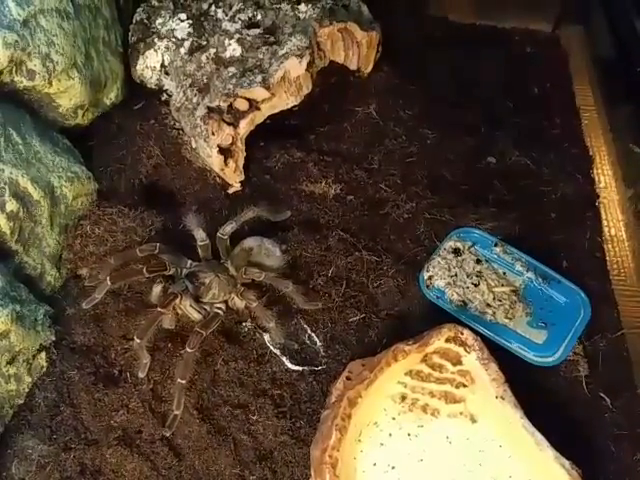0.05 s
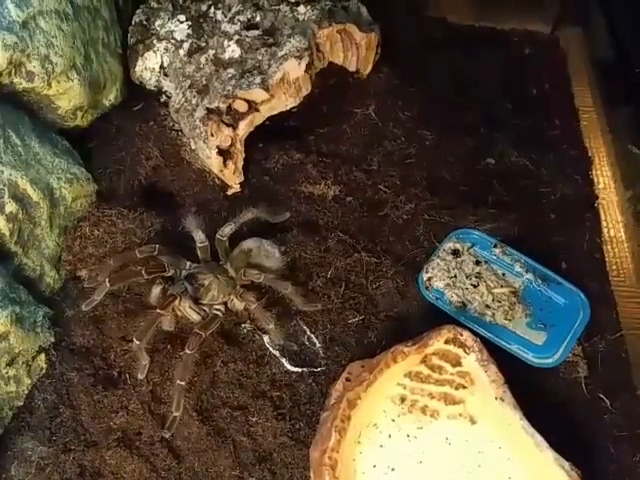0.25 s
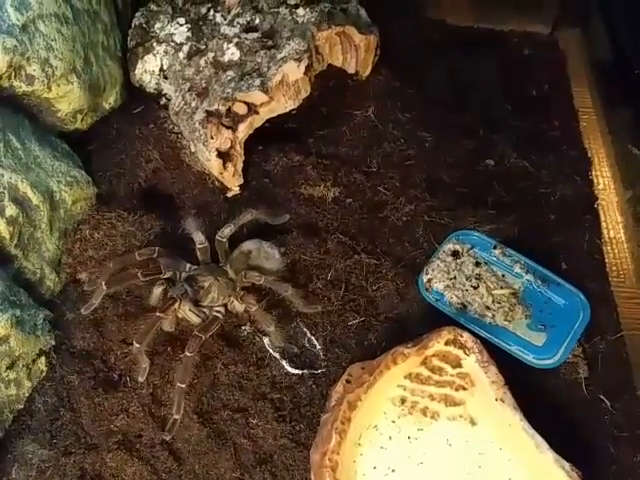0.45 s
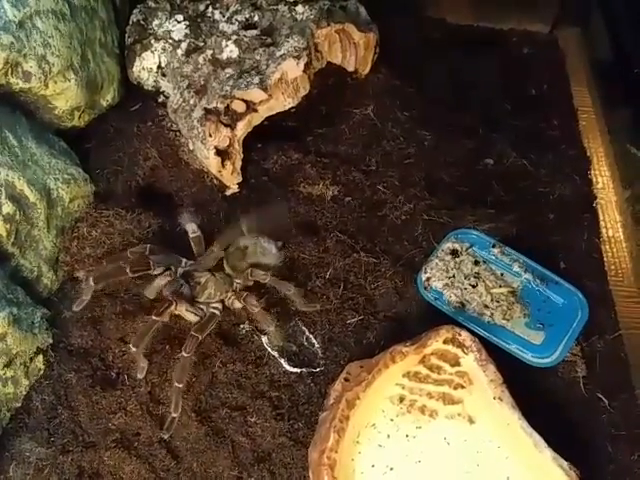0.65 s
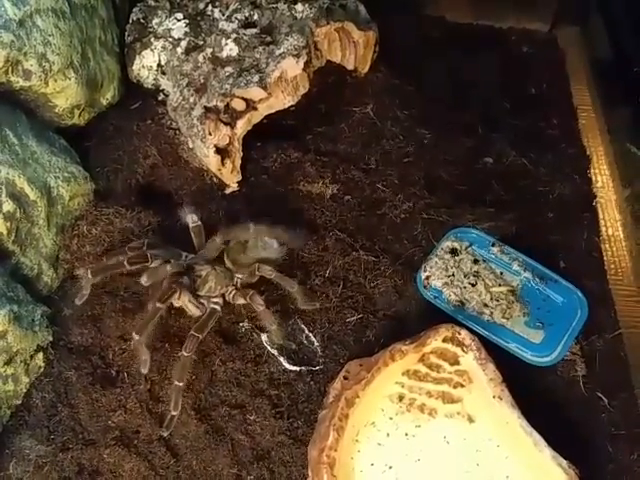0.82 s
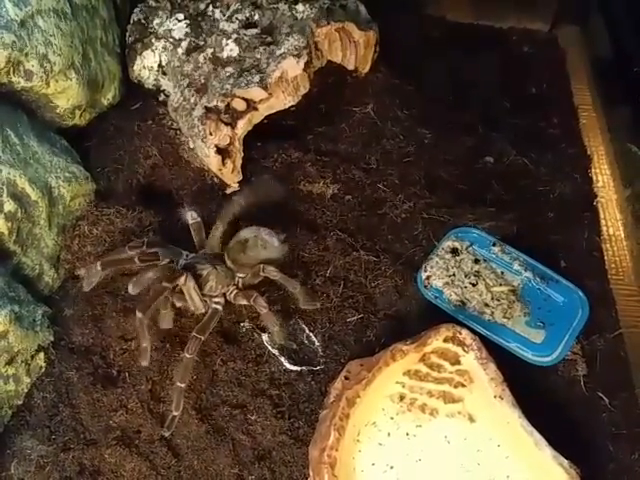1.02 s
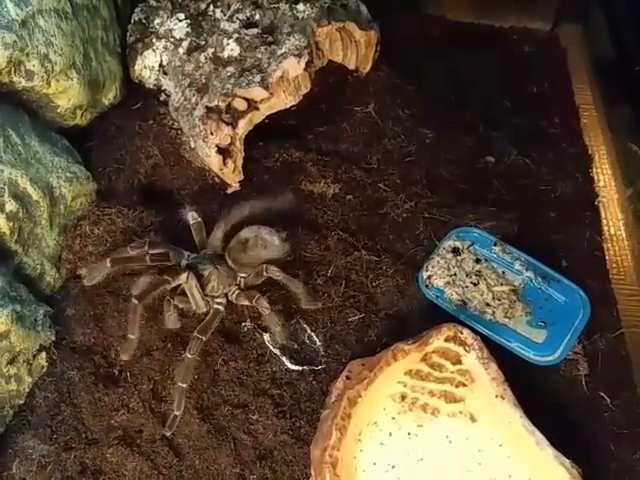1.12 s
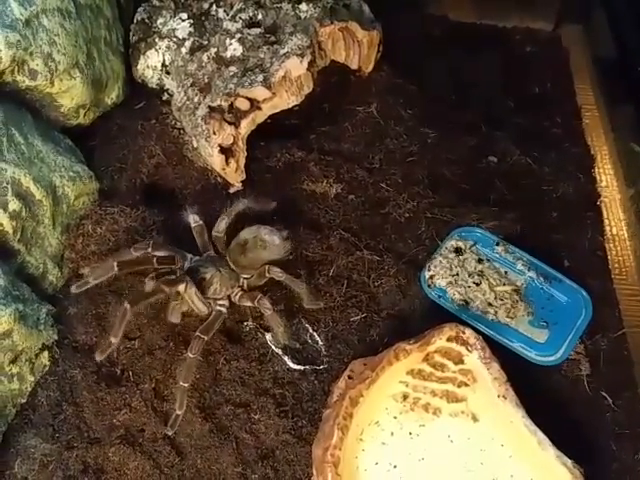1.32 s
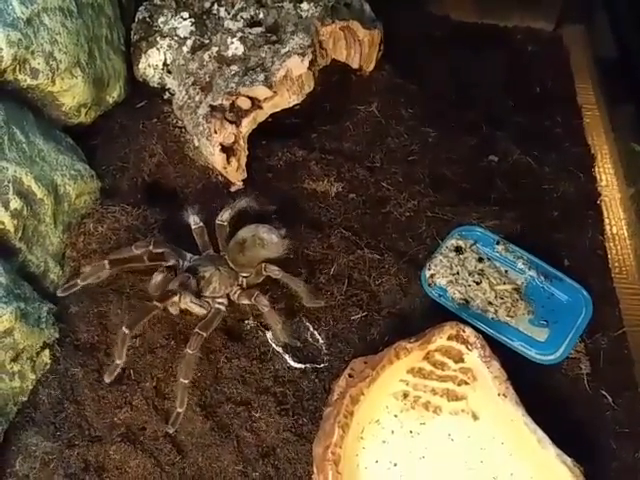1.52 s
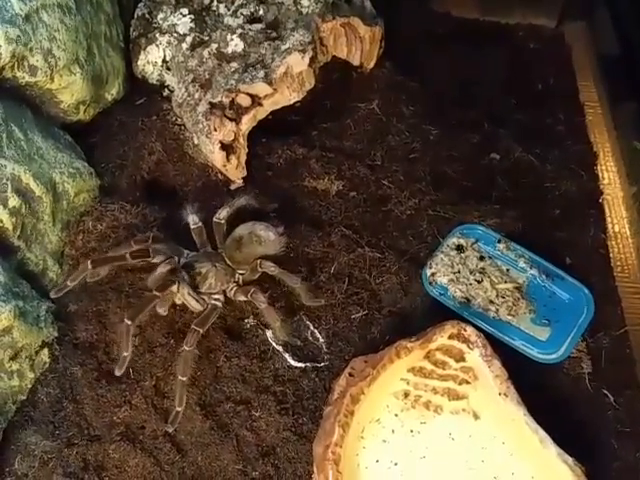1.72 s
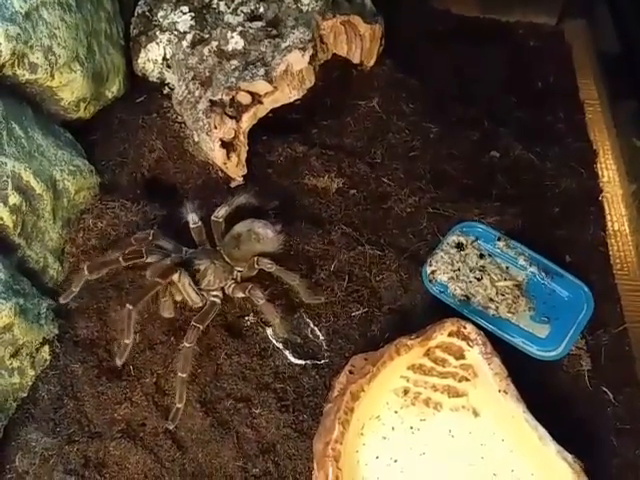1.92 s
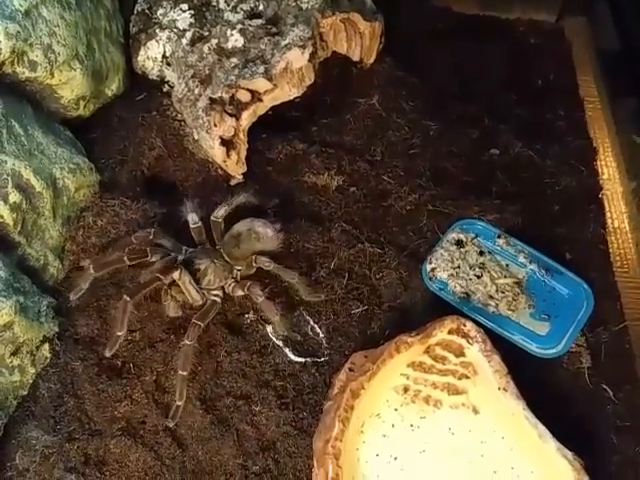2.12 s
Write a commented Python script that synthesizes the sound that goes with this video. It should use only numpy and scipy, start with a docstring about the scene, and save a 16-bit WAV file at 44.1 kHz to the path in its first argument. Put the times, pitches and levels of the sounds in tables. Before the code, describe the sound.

Hollow knocks on a terrarium, followed by the faint, high hiss of a tarantula.

```python
"""A terrarium is knocked while being handled: a light touch, a clattering blow, a shuffle, a later bump.
Each knock makes a short clack, rings the panels and sets the whole tank booming.
The tarantula inside answers with two long strokes of hissing, made by rubbing its bristles together.
Single bristles snap with tiny high ticks during the hiss. The room is quiet, with a faint echo."""
import sys
import numpy as np
from scipy import signal
from scipy.fft import rfft, irfft
from scipy.io import wavfile
from scipy.ndimage import uniform_filter1d

SR = 44100
rng = np.random.default_rng(int(sys.argv[2]) if len(sys.argv) > 2 else 0)


def dump_mix(stems):
    """Bounce the given channels to the path in sys.argv[1] as a 16-bit WAV at rate SR."""
    frames = np.atleast_2d(stems).T  # one column per channel
    limited = np.clip(frames, -1, 1)  # hard clip at full scale
    pcm = np.round(limited * 32767).astype(np.int16)
    wavfile.write(sys.argv[1], SR, pcm)


N = 94815

# the tone of a clack on the tank (frequency [Hz], level [dB])
CLACK_TONE = [(60, -27.5), (200, 6), (400, 3.5), (800, 0), (1500, 1.5), (2400, 5), (3050, -1.5), (3800, -1),
              (6200, -1.5), (7300, -24.5), (10000, -19), (16000, -28)]
# how long a clack takes to fade by 60 dB (frequency [Hz], fade time [s])
CLACK_FADE = [(100, 0.079), (600, 0.19), (2000, 0.093), (4000, 0.077), (7000, 0.034), (14000, .025)]
# how alike a clack is on the left and right (frequency [Hz], likeness [1 = the same])
CLACK_LIKENESS = [(100, 1), (350, 1), (700, 0.41), (1400, 0.44), (3000, -0.18), (12000, 0.5)]
# how alike the sound in the room is on the left and right (frequency [Hz], likeness [1 = the same])
ROOM_LIKENESS = [(50, 0.82), (130, 0.97), (250, 0.73), (700, 0.36), (2000, 0), (16000, 0.4)]
PANEL_DELAY_S = np.array([[0.00026], [0]])  # the panels' ring reaches the left microphone later


def gain_of(db):
    """Turns decibels into a number to multiply by."""
    return 10 ** (np.asarray(db) / 20)


def evened(x):
    """Scales a sound to an average (rms) size of one."""
    return x / np.sqrt(np.mean(x ** 2) + 1e-20)


def look_up(points, hz):
    """Reads between the rows of a table, with frequency spaced in octaves."""
    row_hz, value = np.transpose(points)
    return np.interp(np.log(hz + 1), np.log(row_hz + 1), value)


def loudness(points):
    """Turns (time [s], level [dB]) points into a gain for every sample."""
    return gain_of(np.interp(np.arange(N) / SR, *np.transpose(points)))


def pan(db):
    """Left and right gains; a negative number leans the sound to the right."""
    return gain_of([[db / 2], [-db / 2]])


def add(mix, start_s, sound):
    """Adds a stereo sound to the mix at a given time."""
    part = mix[:, round(start_s * SR):][:, :sound.shape[1]]
    part += sound[:, :part.shape[1]]


def coloured(x, tone, likeness=None):
    """Gives a stereo sound a tone and makes its two sides more or less alike."""
    hz = np.fft.rfftfreq(x.shape[1], 1 / SR)
    left, right = rfft(x)
    shared = np.clip(look_up(likeness, hz), -1, 1) if likeness else 0
    left = shared * right + np.sqrt(1 - shared ** 2) * left
    return evened(irfft(np.array([left, right]) * gain_of(look_up(tone, hz)), x.shape[1]))


def noise(samples, tone, likeness=None):
    """Stereo noise with a given tone."""
    return coloured(rng.standard_normal((2, samples)), tone, likeness)


def faded(x, fade_times):
    """Lets each frequency die away at its own speed."""
    hz, t, spectrum = signal.stft(x, SR, nperseg=256)
    fade = gain_of(-60 * t / look_up(fade_times, hz)[:, None])
    return signal.istft(spectrum * fade, SR, nperseg=256)[1][:, :x.shape[1]]


def muffled(x, cutoff_hz):
    """Takes away the sound above a frequency."""
    return signal.sosfilt(signal.butter(8, cutoff_hz, fs=SR, output="sos"), x)


def background():
    """Steady air and microphone hiss, and a low room rumble that slowly comes up."""
    # the tone of the steady hiss (frequency [Hz], left level [dB], right level [dB])
    air_tone = [(20, 10.5, 19), (98, 13, 10), (312.4, 3, 5.5), (700, 1.5, 1), (1373, -0.5, -1),
                (2920, -5.5, -5.5), (6000, -10.5, -10.5), (9200, -7, -20.5), (10860, -3.5, -5.5),
                (13000, -5.5, -15), (16000, -24.5, -5)]
    # how loud the room's rumble is (time [s], level [dB])
    rumble_levels = [(0, -108), (1.4, -78), (1.7, -73), (2.0, -71.5), (2.15, -74.5)]
    # the tone of the rumble (frequency [Hz], level [dB])
    rumble_tone = [(20, -13.5), (45, 5.5), (70, -8.5), (110, 4), (210, -5.5), (330, 0.5), (600, -9.5),
                   (1500, -29.5), (4000, -21)]
    hz = np.fft.rfftfreq(N, 1 / SR)
    air_gains = gain_of([look_up(np.array(air_tone)[:, [0, side]], hz) for side in (1, 2)])
    air = evened(irfft(rfft(rng.standard_normal((2, N))) * air_gains, N))
    rumble = loudness(rumble_levels) * noise(N, rumble_tone, ROOM_LIKENESS)
    return gain_of(-68.5) * air + rumble


def shuffle():
    """Soft rubbing keeps the tank droning between the knocks, with a little dry scuffing."""
    # how loud the rubbed tank drones (time [s], level [dB])
    drone_levels = [(0, -59.5), (.06, -61.5), (.12, -63.5), (.36, -45.5), (.45, -50), (.56, -51.5),
                    (.7, -60.5), (.85, -53), (1.0, -64.5), (1.12, -64), (1.4, -75), (2.15, -90)]
    # the tone of the drone (frequency [Hz], level [dB])
    drone_tone = [(30, -35), (75, -9.5), (98, -8.5), (112, 4), (138, -7.5), (178, -6), (215, -17),
                  (330, -20.5), (450, -29.5), (700, -37.5), (2000, -39), (8000, -57.5)]
    # how loud the scuffing is (time [s], level [dB])
    scuff_levels = [(.3, -99), (.45, -75), (.51, -67), (.555, -64), (.62, -66), (.7, -74), (.8, -69),
                    (1.0, -76.5), (1.2, -100)]
    # the tone of the scuffing (frequency [Hz], level [dB])
    scuff_tone = [(150, -34), (330, 13.5), (700, 1.5), (1000, -3.5), (1500, 3.5), (2400, -4.5), (3200, -11),
                  (7000, -19.5)]
    drone = loudness(drone_levels) * noise(N, drone_tone, ROOM_LIKENESS)
    scuff = loudness(scuff_levels) * noise(N, scuff_tone, ROOM_LIKENESS)
    return drone + scuff


def knocks():
    """Each knock clacks and rings the panels and the spot it strikes; then a boom swells in the tank."""
    # the knocks on the tank (time [s], boom level [dB], boom tilt [dB per octave], clack level [dB],
    # extra treble [dB], clack cutoff [Hz], struck spot's pitch [Hz], its level [dB], contact time [s])
    hits = [(0.1469, -39, -16, -56.5, 1.5, 6800, 1590, 17, 0.003),
            (0.1572, -46, 7.5, -49, -11.5, 6850, 1600, -2.5, 0.00017),
            (0.2106, -33.5, 5.5, -37, 2, 13150, 2270, 2, 0.0001),
            (0.217, -24, 0, -44, 1.5, 9020, 2506, -14, 0.0006),
            (0.2429, -31, 10, -48.5, 0.5, 7100, 3550, 3, 0.001),
            (0.246, -15, -3.5, -38.5, -2, 7300, 3904, -9, 0.0003),
            (0.2528, -21, -11, -36.5, -16.5, 2100, 393, -3.5, 0.001),
            (0.2655, -20, -8.5, -38.5, -8.5, 6950, 1603, -2, 0.00052),
            (0.2776, -29.5, 3.5, -43.5, -4, 2030, 1598, -7.5, 0.0008),
            (0.2844, -36.5, 2.5, -42.5, -6, 1150, 640, -1.5, .001),
            (0.318, -43.5, 2.5, -48.5, -7.5, 2960, 2170, -6, 0.002),
            (.3386, -39, -1.5, -58.5, -4.5, 2670, 1500, -10.5, .001),
            (0.5375, -46.5, 2, -53, -7, 1670, 701, 5, 0.01)]
    # the notes the panels ring with (frequency [Hz], level [dB], time to fade by 60 dB [s])
    panel_notes = [(435, -10.5, 0.17), (528.5, -3, 0.14), (612, -12, 0.22), (645, -12, 0.15),
                   (765, -11, 0.13), (852, -10.5, 0.13), (974, -9.5, 0.11), (1052, -10, 0.12),
                   (1190, -11, 0.11), (1351, -10, .09), (1525, -4, 0.08), (1586, -2, .095),
                   (1636, -6, .075), (2330, -17, 0.08)]
    # the low notes of the whole tank (frequency [Hz], level [dB], time to fade by 60 dB [s])
    tank_notes = [(55.6, -14.5, 0.16), (89.3, 4.3, 0.07), (107, 4.3, 0.16), (163.3, 4.6, 0.15),
                  (258, -14.5, 0.15), (323, -17, 0.15)]
    treble_from_hz, tilt_centre_hz = 3370, 110
    spot_fade_s, boom_rise_s = 0.065, 0.013
    sharp_share, settle_s = 0.133, 0.03
    out, t = np.zeros((2, N)), np.arange(SR) / SR
    treble_share = 1 - 1 / (1 + (np.fft.rfftfreq(SR, 1 / SR) / treble_from_hz) ** 10)
    crack = 1 + gain_of(-4.5) * np.exp(-t / 0.003)  # a clack is louder in its first instant
    # this clock runs fast at first, so the boom starts a little high and then settles
    boom_time = t + sharp_share * settle_s * (1 - np.exp(-t / settle_s))
    for start_s, boom_db, tilt_db, clack_db, treble_db, cutoff_hz, spot_hz, spot_db, contact_s in hits:
        burst = noise(SR, CLACK_TONE, CLACK_LIKENESS)
        burst = irfft(rfft(burst) * gain_of(treble_db * treble_share), SR)
        clack = muffled(faded(burst, CLACK_FADE) * crack, cutoff_hz)
        ring = 0
        for hz, db, fade_s in [*panel_notes, (spot_hz, spot_db, spot_fade_s)]:
            cycles = hz * (t - PANEL_DELAY_S) + rng.random()
            ring += gain_of(db - 60 * t / fade_s) * np.sin(2 * np.pi * cycles)
        # the more the boom outweighs the clack, the harder the panels ring
        ring *= gain_of(0.37 * (boom_db - clack_db - 15))
        contact = 1 - np.exp(-t / contact_s)
        add(out, start_s, gain_of(clack_db) * (clack + ring) * contact * pan(-3))
        boom = 0
        for hz, db, fade_s in tank_notes:
            note_db = db + tilt_db * np.log2(hz / tilt_centre_hz)
            boom += gain_of(note_db - 60 * t / fade_s) * np.sin(2 * np.pi * hz * boom_time)
        swell = 1 - np.exp(-t / boom_rise_s)
        add(out, start_s, gain_of(boom_db) * boom * swell * pan(-1.5))
    return signal.sosfilt(signal.butter(4, 36, "highpass", fs=SR, output="sos"), out)


def room_echo(x):
    """The room adds a faint, smooth echo that lasts longest in the bass."""
    # how long the echo takes to fade by 60 dB (frequency [Hz], fade time [s])
    echo_fade = [(60, 0.47), (130, 0.44), (500, 0.44), (2000, 0.35), (6000, 0.45), (14000, 0.22)]
    flat_tone = [(20, 0.0073), (20000, 0.0072)]
    tail = faded(noise(SR, flat_tone, ROOM_LIKENESS), echo_fade)
    tail = tail / np.linalg.norm(tail[0])
    return gain_of(-14) * signal.fftconvolve(x, tail, axes=1)[:, :N]


def bristle_slips():
    """Bristles slip past each other in a dense stream of tiny clicks of uneven size."""
    slips_per_s = 11000
    size_db = np.minimum(rng.exponential(1, (2, N)), 4)
    direction = rng.choice([-1, 1], (2, N))
    slipping = rng.random((2, N)) < slips_per_s / SR
    return gain_of(size_db) * direction * slipping


def tarantula_hiss():
    """The spider rubs its bristles: the slips ring a few narrow bands under a wide, fine fizz."""
    # the bands the rubbing rings (frequency [Hz], width [Hz], left level [dB], right level [dB])
    bristle_bands = [(4630, 1300, -12, -14.5), (5270, 410, -3, -5.5), (5583, 260, -9.5, 0.5),
                     (6060, 69, -7.5, 5), (6227, 550, -21, 1.5), (6720, 180, -27, -8), (7400, 370, -9, -42),
                     (8120, 510, -9.5, -9), (8740, 200, -22, -4.5), (9070, 230, -6.5, -23),
                     (10700, 300, -17.5, -5), (11900, 400, -27, -19.5), (14500, 400, -45.5, -9)]
    # how hard the spider rubs (time [s], level [dB])
    rub_levels = [(0, -100), (.48, -86), (.56, -71), (.65, -66.5), (.8, -67.5), (1.14, -67.5), (1.27, -72),
                  (1.36, -77.5), (1.46, -68.5), (1.56, -69), (1.66, -71), (1.8, -68.5), (2.02, -68),
                  (2.15, -77.5)]
    # how loud the fizz is (time [s], level [dB])
    fizz_levels = [(0, -81.5), (.5, -79), (.62, -75), (.8, -65), (.95, -66.5), (1.15, -67.5), (1.3, -68),
                   (1.4, -69.5), (1.55, -70.5), (1.8, -69.5), (2.0, -73.5), (2.15, -71)]
    # the tone of the fizz (frequency [Hz], level [dB])
    fizz_tone = [(1000, -45.5), (3300, -11.5), (4600, -11.5), (6300, -4), (7050, -6), (7700, -2.5),
                 (9800, -1), (11400, 1.5), (12900, -9.5), (13800, -2.5), (15700, -2.5)]
    hz = np.fft.rfftfreq(N, 1 / SR)
    band_power = 0
    for centre_hz, width_hz, left_db, right_db in bristle_bands:
        distance = 1.3 * (hz - centre_hz) / width_hz
        band_power += gain_of([[left_db], [right_db]]) ** 2 / (1 + distance ** 2) ** 3
    hiss = evened(irfft(rfft(bristle_slips()) * np.sqrt(band_power), N))
    flicker_db = 0.66 * evened(uniform_filter1d(rng.standard_normal(N), size=700))
    fizz = coloured(bristle_slips(), fizz_tone) * pan(-2.5)
    return gain_of(flicker_db) * (loudness(rub_levels) * hiss + loudness(fizz_levels) * fizz)


def bump():
    """A last, woody bump: low notes swell more slowly, so the knock comes first and the boom follows."""
    # the notes the bump rings with (frequency [Hz], level [dB], time to fade by 60 dB [s])
    bump_notes = [(112, 9, 0.23), (184.7, -6, 0.275), (278.4, -8, 0.19), (630.6, -10, 0.13),
                  (698, -10, 0.11), (1025, -16.5, 0.06), (1455, -9, 0.12), (1560, -14, 0.074),
                  (2000, -5, 0.073), (2260, -18, 0.09)]
    start_s, swell_cycles = 0.7398, 1.4
    out, t = np.zeros((2, N)), np.arange(SR) / SR
    ring = 0
    for hz, db, fade_s in bump_notes:
        swell = 1 - np.exp(-t * hz / swell_cycles)
        ring += gain_of(db - 60 * t / fade_s) * swell * np.sin(2 * np.pi * hz * (t - PANEL_DELAY_S))
    clack = faded(noise(SR, CLACK_TONE, CLACK_LIKENESS), CLACK_FADE)
    puff = gain_of(-8) * muffled(clack, cutoff_hz=2200)
    add(out, start_s, gain_of(-41.5) * (ring + puff) * pan(-2.5))
    return out


def bristle_ticks():
    """Now and then a single bristle lets go with a very high tick."""
    # single bristles snapping (time [s], level [dB])
    snaps = [(0.881, -61), (0.913, -58.5), (0.923, -58), (0.973, -57), (0.989, -55), (1.061, -58),
             (1.137, -53.5), (1.324, -57), (1.445, -61), (1.535, -64), (1.787, -66)]
    # the tone of a tick (frequency [Hz], level [dB])
    tick_tone = [(3000, -45), (8000, -9.5), (10000, -16), (10900, 5.5), (12200, 2), (13700, 3), (15700, -3)]
    rise_s, fall_s, tail_s, tail_db = 0.0004, 0.0026, 0.022, -15
    out, t = np.zeros((2, N)), np.arange(2048) / SR
    fall = np.exp(-t / fall_s) + gain_of(tail_db) * np.exp(-t / tail_s)
    shape = (1 - np.exp(-t / rise_s)) * fall
    for start_s, db in snaps:
        add(out, start_s, gain_of(db) * shape / shape.max() * noise(len(t), tick_tone))
    return out * pan(-6)


def scene():
    """The tank, the spider and the room together; only the knocks and the bump get an echo."""
    blows = knocks() + bump()
    return blows + room_echo(blows) + shuffle() + tarantula_hiss() + bristle_ticks() + background()


def record(dry):
    """The recorder cuts off the very highest treble."""
    cutoff_hz = 15780
    treble_cut = signal.firwin(801, cutoff_hz, window=("kaiser", 9), fs=SR)
    return signal.oaconvolve(dry, treble_cut[None], "same")


dry = scene()
out = record(dry)
dump_mix(out)
```